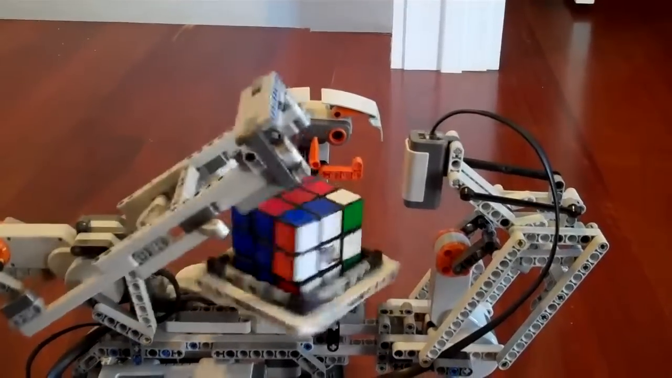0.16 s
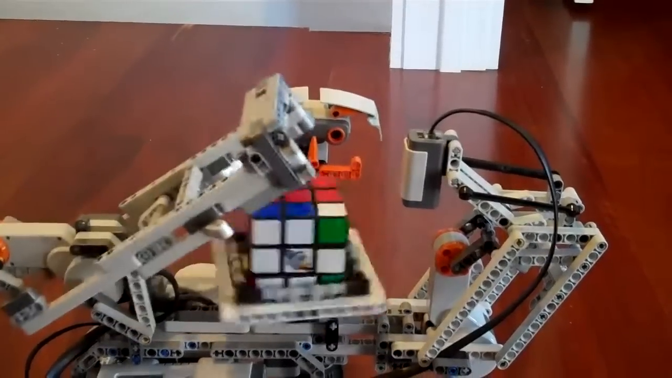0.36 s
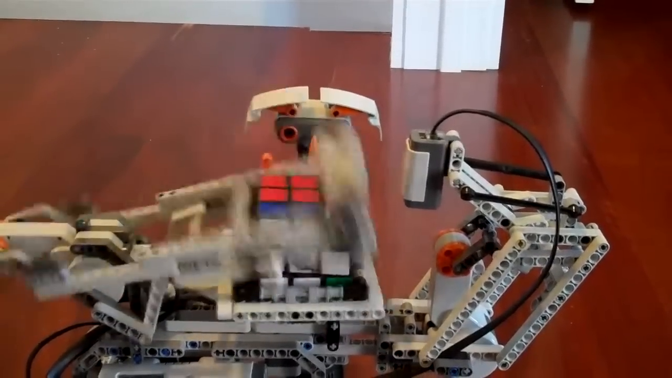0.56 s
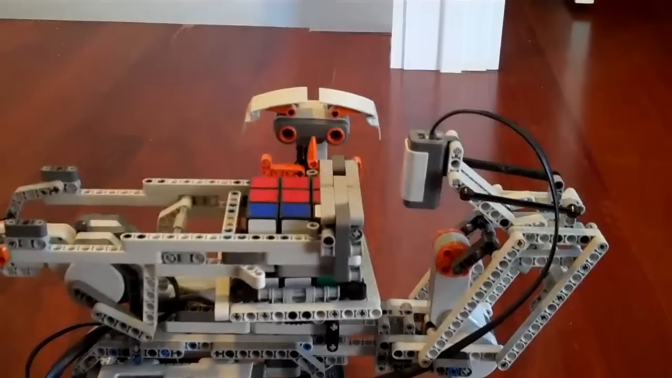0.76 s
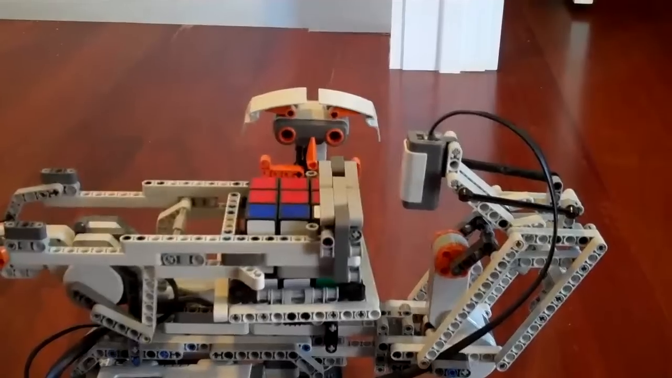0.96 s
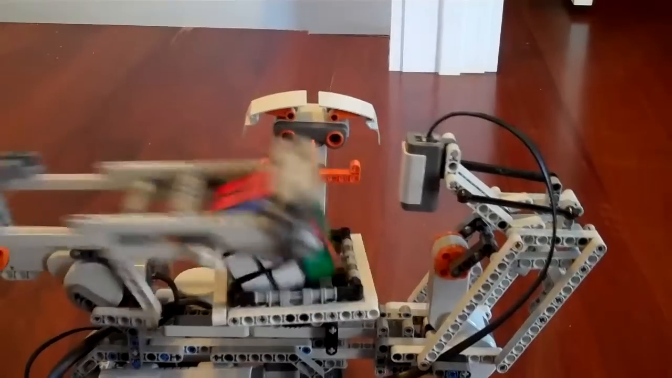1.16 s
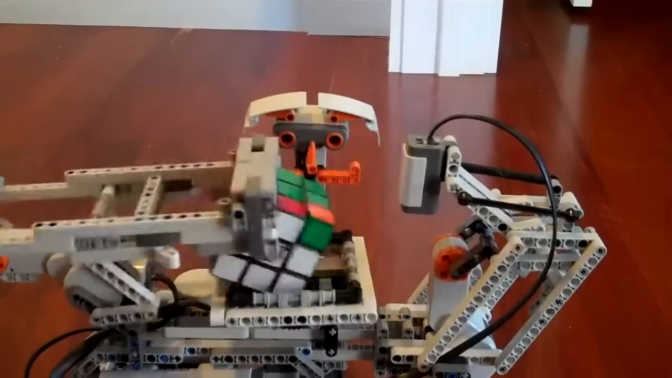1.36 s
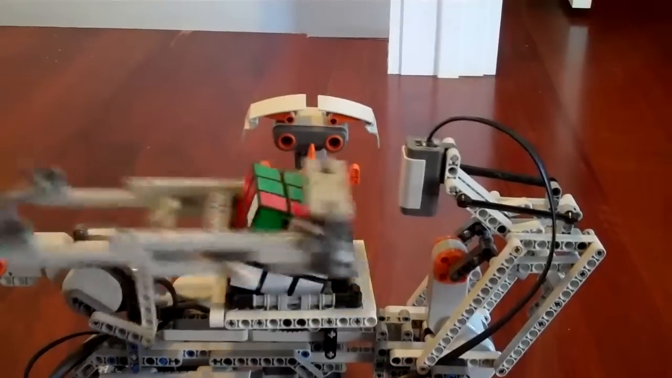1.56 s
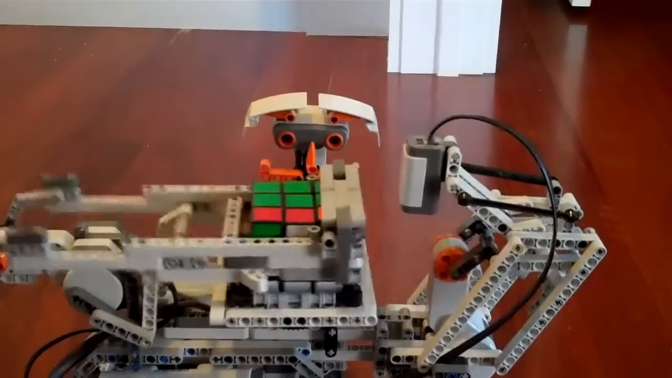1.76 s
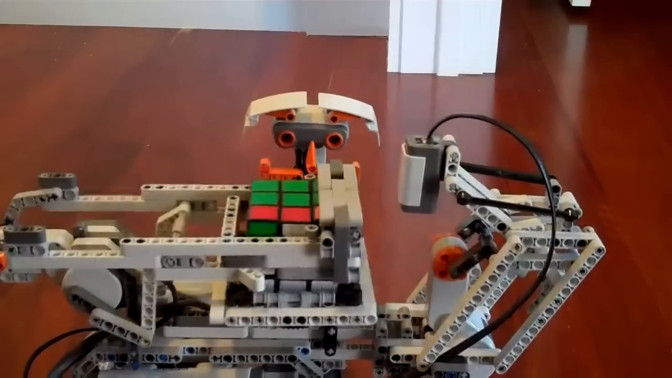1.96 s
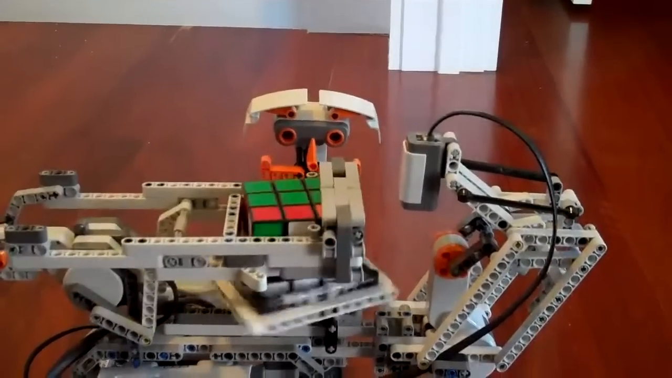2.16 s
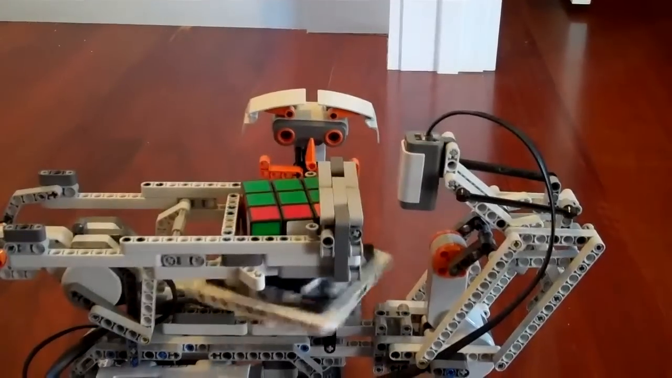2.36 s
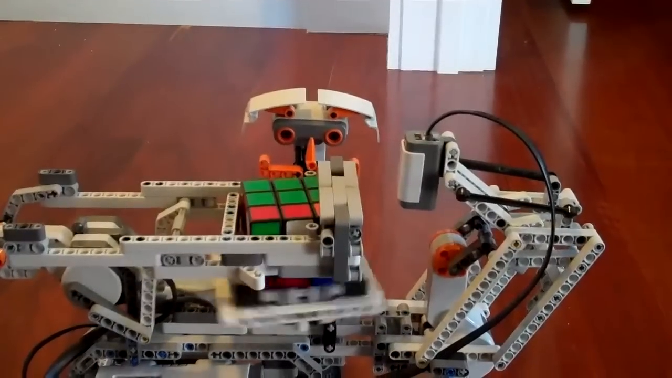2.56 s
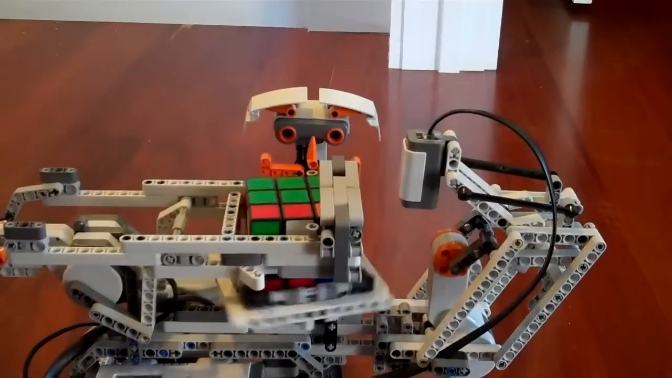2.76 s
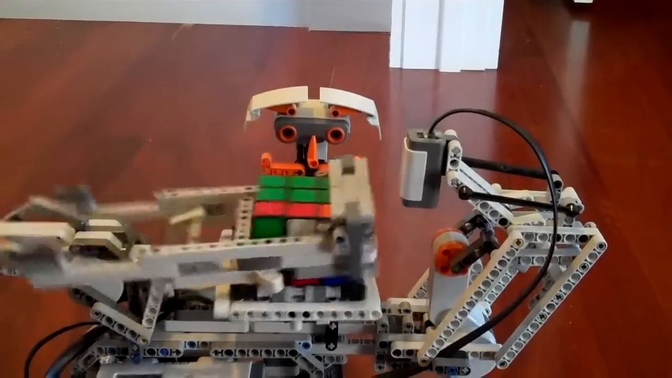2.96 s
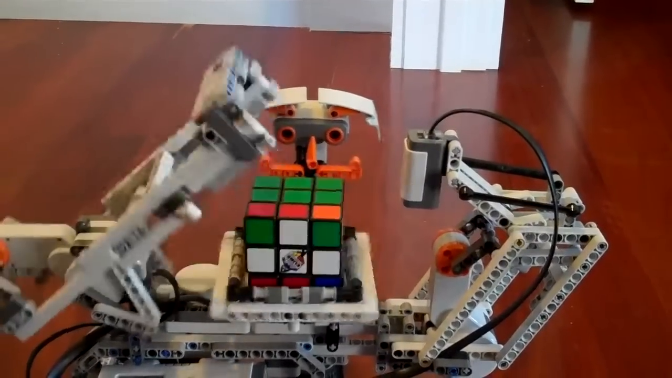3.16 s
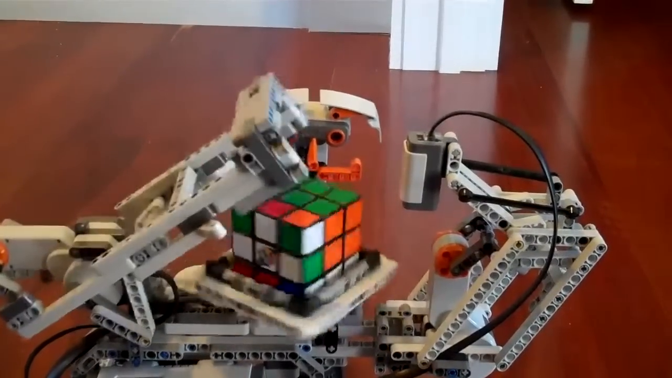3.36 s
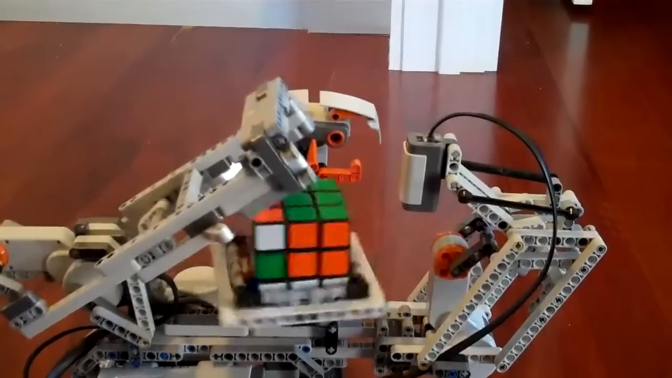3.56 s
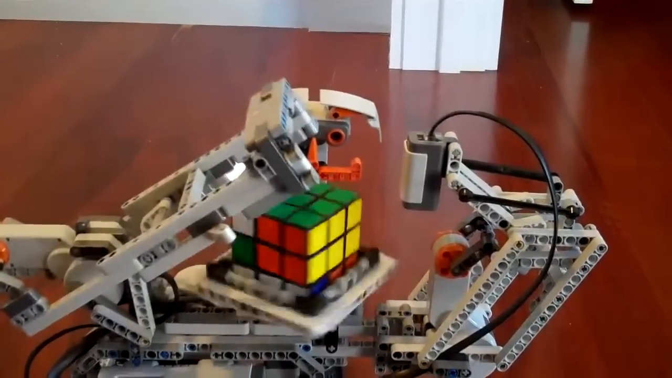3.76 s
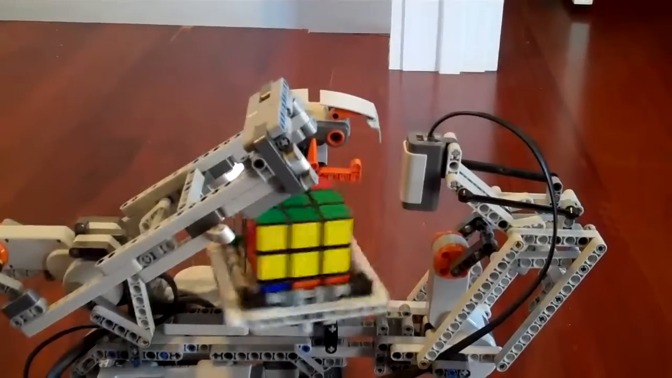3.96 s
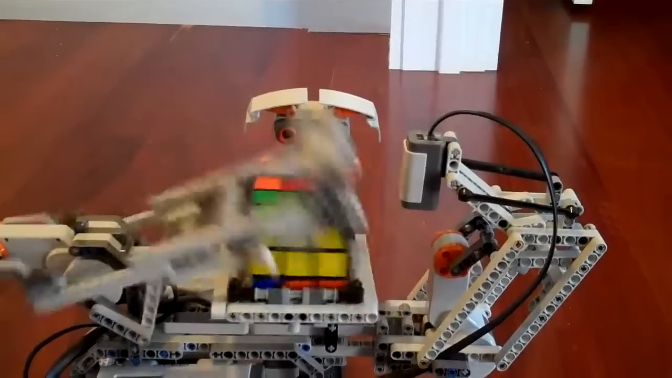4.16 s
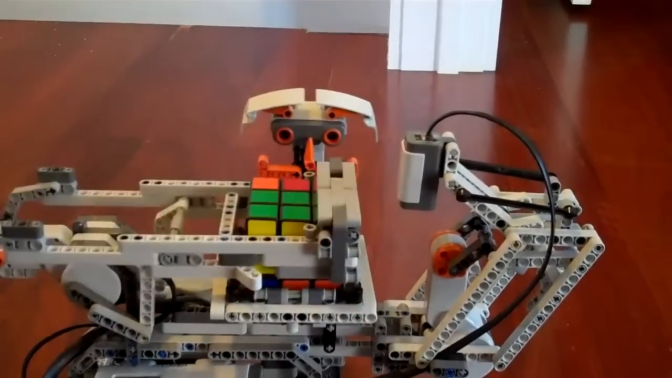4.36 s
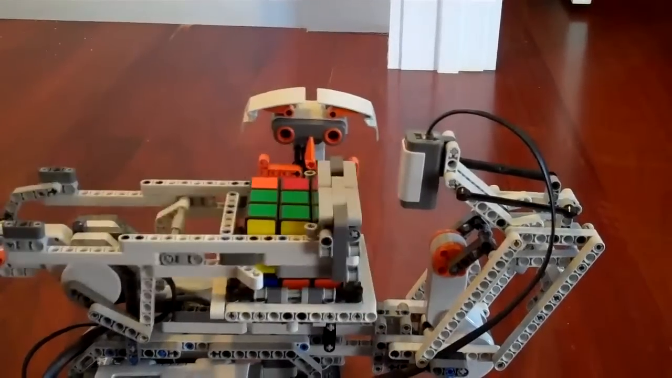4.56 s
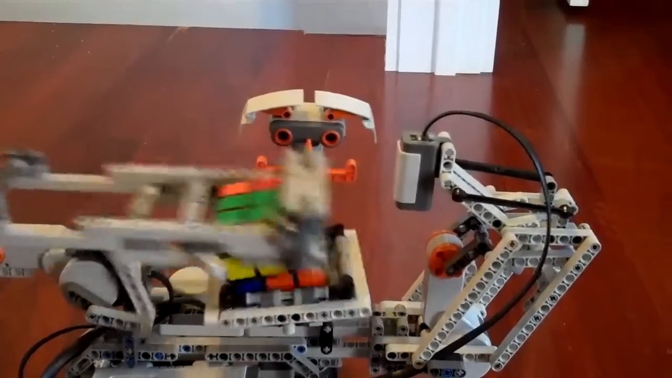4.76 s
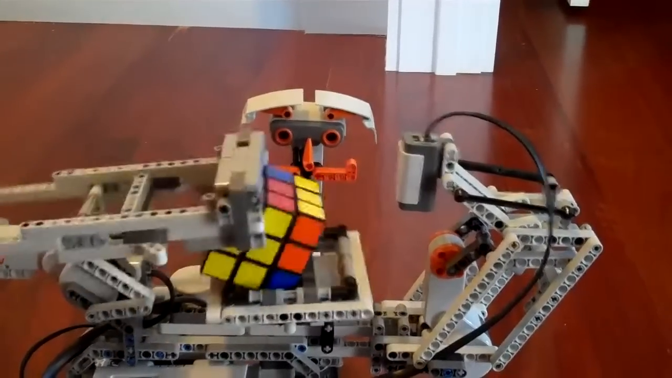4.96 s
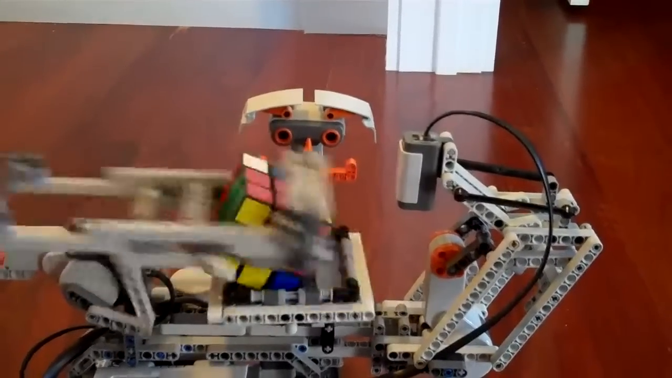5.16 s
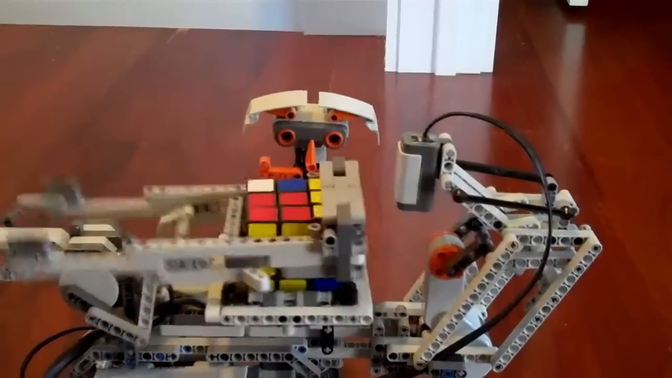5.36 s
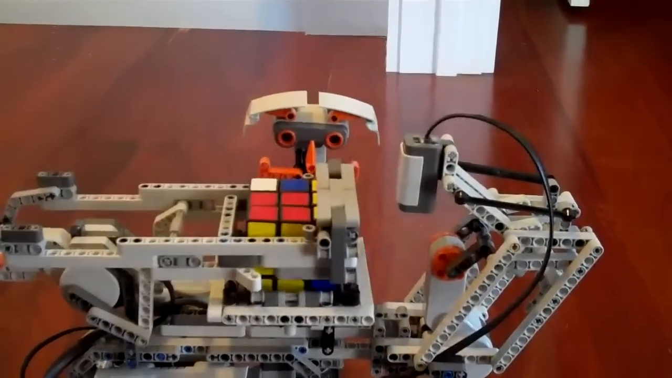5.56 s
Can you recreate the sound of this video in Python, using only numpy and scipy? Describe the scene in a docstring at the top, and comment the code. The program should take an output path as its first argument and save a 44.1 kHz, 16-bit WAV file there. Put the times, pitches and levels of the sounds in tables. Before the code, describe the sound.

A plastic toy robot works a puzzle cube close to a stereo microphone, slightly left. A half-second turntable whir gives way to loud clacks, then brief arm-motor zips and clicks. Two longer grinding whirs follow, split by a short arm burst; another loud clack leads into more zips and ticking knocks. Small, fairly dry room with faint low rumble.

```python
"""A plastic toy robot on a hard floor turns and flips a puzzle cube, close to a two-port microphone.
The turntable runs in the first half second; the flipping arm then works in short bursts amid knocks until 2 s.
Two more turntable stretches follow (2.1 to 3 s, 3.3 to 4.1 s), then arm and knocks again to the end.
Geared motors are noise impacts through a housing filter plus overtones of the tooth rate; knocks are
modes rung by bursts of contacts; filtered noise makes the floor rumble, room murmur and faint hum below."""
import sys
import numpy as np
from scipy import signal
from scipy.fft import rfft, irfft
from scipy.io import wavfile
from scipy.ndimage import uniform_filter1d

SR = 44100
rng = np.random.default_rng(int(sys.argv[2]) if len(sys.argv) > 2 else 0)


def digitize_waveform(pressure):
    """Quantize a signal to 16-bit integers and store it at the path in sys.argv[1].

    Rows of a 2-D input are taken as channels; values are limited to [-1, 1].
    """
    field = np.atleast_2d(pressure).T
    bounded = np.clip(field, -1, 1)
    quanta = np.round(bounded * 32767).astype(np.int16)
    wavfile.write(sys.argv[1], SR, quanta)


N = 247842

# impacts of cube and arm: start_s, peak_db (middle band), low_db and treble_db (against that peak), pitch_hz
KNOCK_EVENTS = [(.6742, -2, -23, -8, 5000), (.6863, -18.5, -11.5, 4, 4490), (0.7328, 1, -19.5, -7, 4700),
                (0.7595, -18, -11.5, -7, 4440), (0.8678, -34.5, -15, -4, 4250),
                (0.9265, -35.5, -23, -16, 5380), (1.055, -32, -20, -19, 5470),
                (1.2113, -15.5, -28, -14, 5700), (1.2397, -21, -16, -11, 5270),
                (1.3998, -33, -21, -12, 2320), (1.4346, -19.5, -27, -4, 4830),
                (1.479, -21.5, -20, -7, 4700), (1.494, -13.5, -24, -7.5, 4050),
                (1.5402, -34, -13, -9, 3710), (1.566, -33, -20, -11, 5000), (1.6422, -19.5, -22, -11, 5660),
                (1.6633, -15, -26, -8, 5440), (1.7071, -11, -28, -7, 5100), (1.7672, -8.5, -23, -9.5, 3630),
                (1.7924, -16.5, -15.5, 0, 4250), (1.896, -19, -39, -12, 5500), (1.9724, -28, -33, -3, 5400),
                (3.05, -22, -24, -18, 4871), (3.0715, -15, -15, -23, 5817),
                (3.2597, -16.5, -32, -2.5, 5800), (4.2978, -8.5, -20, -4, 5270), (4.319, -19, -18, 1, 5440),
                (4.3465, -11.5, -17.5, 4, 3840), (4.351, 0, -24, -7.5, 5370),
                (4.377, -15.5, -17.5, -17, 5470), (4.45, -30.5, -27, -15, 5350),
                (4.4782, -32, -28, -15, 5190), (4.5356, -39, -21, -17, 4310), (4.573, -39, -19, -12, 5800),
                (4.8596, -20, -23, -14, 4380), (5.0247, -21, -19, -2, 5960), (5.0929, -20, -14, -12, 3260),
                (5.168, -40, -25, -3, 3500), (5.2818, -14, -33, -2.5, 5740), (5.312, -18, -24, -15, 5000),
                (5.3151, -15, -11, -15, 3500), (5.386, -27, -10, -3, 3836), (5.3946, -21, -13, -16, 4252),
                (5.409, -29, -6, -9, 4110), (5.4458, -27.5, -16, -11, 3070), (5.4605, -16, -27, -5.5, 5860)]


def turntable():
    """Gear-mesh excitation: the turntable's motor runs rattle its teeth, and load makes them whine."""
    # powered runs: start_s, powered_s, full_level_db, spin_up_ms, coasting_fade_db_per_s
    runs = [(.04, .475, -28.5, 32, 280), (2.075, .665, -23.5, 60, 235), (2.795, .155, -24, 55, 250),
            (3.25, 0.892, -26.5, 38, 287)]
    # whine bursts, each a list of points: time_s, tooth_rate_hz, whine_against_rattle_db
    whine = [
        [(.15, 850, -7), (.5, 850, -7)],
        [(2.19, 580, -9), (2.23, 660, -6), (2.25, 697, -1), (2.38, 712, -1), (2.46, 724, -3), (2.5, 742, -5)],
        [(2.5, 742, -6), (2.6, 768, -5), (2.7, 768, -5), (2.73, 745, -6), (2.76, 715, -9), (2.79, 670, -14)],
        [(3.38, 855, -6), (3.7, 860, -6), (4.14, 853, -6)],
    ]
    # for each burst: teeth per shaft turn
    tooth_counts = [10, 7, 7, 10]
    # for each burst: wander of the tooth timing (periods)
    scatter = [.18, .07, .12, .13]
    # for each burst: position of the second wheel as the whine starts (turns)
    wheel_turn = [.5, .2, -.1, -.2]
    # relative response of the housing to rattling teeth: frequency_hz, density_db_per_hz
    body = [(240, -60), (400, -35), (630, -28), (1430, -19), (1700, -13), (2280, -9), (2560, -5),
            (3350, -9.5), (3750, -4), (4150, -0.5), (5000, -4), (5900, -10.5), (6700, -8), (11400, -22.5),
            (13400, -30.5), (14900, -78)]
    # relative response to loaded teeth: frequency_hz, density_db_per_hz
    mesh = [(350, -42), (720, -23.5), (900, -27), (1200, -8), (1430, -6), (1720, -11), (2150, -8.5),
            (2800, 0.5), (3550, -9.5), (4300, 3), (5000, 1), (5800, -18), (7900, -7), (12000, -19),
            (15000, -41)]
    return motor(run_level(runs), whine, tooth_counts, scatter, body, mesh,
                 shaft_db=1.7, wheel_db=1.8, wheel_turn=wheel_turn, grain_db=1.5)


def flipping_arm():
    """Gear-mesh excitation under transient load: powered runs, knocks and creaks all stir the arm's teeth."""
    # powered runs: start_s, powered_s, full_level_db, spin_up_ms, coasting_fade_db_per_s
    runs = [(-.1, .1, -29.5, 20, 195), (.562, .203, -25.5, 22, 270), (1.158, 0.16, -25.5, 31.3, 192),
            (1.548, 0.053, -30, 11.4, 74), (1.708, .032, -21, 16, 700), (1.7, .1, -29, 13, 430),
            (1.82, 0.075, -29.5, 7.7, 380), (3.022, 0.17, -23, 27, 181), (4.196, 0.12, -22, 26.8, 230),
            (4.34, 0.043, -27, 10.3, 330), (4.785, 0.17, -29, 25, 280), (4.965, .052, -29.5, 18.6, 480),
            (5.165, 0.064, -29.5, 24.5, 147), (5.308, .04, -22.5, 13, 260), (5.372, .03, -29, 8, 600),
            (5.415, 0.098, -32.5, 20, 240)]
    # whines: start_s, stop_s, first_hz, steady_hz, easing_ms, timing_wander_periods
    whine_rows = [(.603, .67, 456, 635, 38, .03), (1.214, 1.335, 479, 662, 46, .025),
                  (1.57, 1.63, 429, 625, 38, .1), (1.722, 1.75, 870, 750, 20, .035),
                  (3.08, 3.22, 674, 765, 60, .045), (4.228, 4.29, 455, 700, 65, .04),
                  (4.84, 4.96, 485, 674, 40, .018), (5.2, 5.25, 440, 750, 65, .1),
                  (5.325, 5.37, 832, 760, 65, .03)]
    # relative response of the housing to rattling teeth: frequency_hz, density_db_per_hz
    body = [(240, -58), (400, -35.5), (1000, -18.5), (1700, -11), (2600, -5), (3400, -7), (4350, -1),
            (4900, -4), (5450, -1), (6200, -6), (7200, -7.5), (9500, -14.5), (12300, -23.5), (13800, -31),
            (14900, -81)]
    # relative response to loaded teeth: frequency_hz, density_db_per_hz
    mesh = [(300, -49), (600, -36.5), (1250, -13.5), (1900, -5.5), (2600, -4.5), (3400, -6), (4300, 2.5),
            (4850, 0), (5400, 6), (6100, -3), (7100, -6.5), (9000, -8), (10500, -21), (12000, -13),
            (15000, -50)]
    whine = [ease(*row[:-1]) for row in whine_rows]
    scatter = [row[-1] for row in whine_rows]
    level = np.hypot(run_level(runs), shake_level())
    teeth_per_turn = 7
    return motor(level, whine, [teeth_per_turn] * len(whine), scatter, body, mesh,
                 shaft_db=0.63, wheel_db=0.15, wheel_turn=[0] * len(whine), grain_db=0.67)


def motor(level, whine, tooth_counts, scatter, body, mesh, shaft_db, wheel_db, wheel_turn, grain_db):
    """Amplitude modulation by rotation: the rattle throbs with shaft and wheel; loaded teeth add a whine."""
    shaft_turns_per_wheel_turn = 5.6
    (tooth_hz, share_db), loaded, index = columns(whine)
    shaft = 2 * np.pi * np.cumsum(tooth_hz / np.array(tooth_counts)[index]) / SR
    shaft_at_start = shaft[[int(burst[0][0] * SR) for burst in whine]]
    wheel = (shaft - shaft_at_start[index]) / shaft_turns_per_wheel_turn
    wheel = wheel + 2 * np.pi * np.array(wheel_turn)[index]
    throb_db = shaft_db * np.cos(shaft) + wheel_db * np.cos(wheel)

    # sparse impacts on about 15 % of the samples, some much stronger than others
    hits = (rng.random(N) < .15) * rng.standard_normal(N)
    hits = hits * undb(grain_db * rng.exponential(size=N))
    flicker_db = 1.25 * walk(120) + 1.14 * walk(24.37)
    rattle = unit(colour(hits * undb(throb_db + flicker_db), body))

    overtones = teeth(tooth_hz, np.array(scatter)[index])
    tone = unit(colour(overtones * undb(0.63 * throb_db), mesh))
    share = loaded * undb(share_db)
    return level * (rattle + share * tone) / np.sqrt(1 + share ** 2)


def teeth(tooth_hz, scatter, count=20):
    """Harmonic series of the tooth rate: timing wander is shared, each overtone swells and fades alone."""
    turns = np.cumsum(tooth_hz) / SR + scatter * (walk(60) + 0.52 * walk(400))
    total = 0
    for k in range(1, count):
        total = total + undb(3.0 * walk(70)) * np.sin(2 * np.pi * (k * turns + rng.random()))
    return total


def ease(start_s, stop_s, first_hz, steady_hz, easing_ms, count=12):
    """Exponential relaxation of the tooth rate: points of time_s, tooth_rate_hz, whine_against_rattle_db."""
    t = np.linspace(start_s, stop_s, count)
    hz = steady_hz + (first_hz - steady_hz) * np.exp((start_s - t) * 1000 / easing_ms)
    return np.transpose([t, hz, np.full(count, 3.5)])


def run_level(runs):
    """First-order spin-up: level follows a power of speed, then coasts out; powers of the runs add."""
    loudness_exponent = 3.38
    t, power = slow_time(), 0
    for start_s, powered_s, full_db, spin_ms, fade_db_per_s in runs:
        since = np.clip(t - start_s, 0, powered_s)
        after = np.maximum(t - start_s - powered_s, 0)
        speed = 1 - np.exp(-since * 1000 / spin_ms)
        level = undb(full_db - fade_db_per_s * after) * speed ** loudness_exponent
        power = power + level ** 2
    return np.interp(np.arange(N) / SR, t, np.sqrt(power))


def shake_level():
    """Exponential decay of shaken gears: each knock leaves a short rattle, loose joints a slower creak."""
    # creaks of the arm's loose joints: start_s, level_db, fade_db_per_s
    creaks = [(.8, -50, 45), (1.445, -44, 55), (1.93, -51, 20), (4.42, -46, 110), (5.06, -46, 69),
              (5.56, -69, 60)]
    shake_db, shake_fade_db_per_s = -26.5, 503.5  # level against the knock's own peak
    onset_s = .001
    shakes = [(s, peak_db + shake_db, shake_fade_db_per_s) for s, peak_db, *_ in KNOCK_EVENTS]
    t, level = slow_time(), 0
    for start_s, level_db, fade_db_per_s in shakes + creaks:
        onset = np.clip((t - start_s) / onset_s, 0, 1)
        level = level + onset * undb(level_db - fade_db_per_s * np.maximum(t - start_s, 0))
    return np.interp(np.arange(N) / SR, t, level)


def knocks():
    """Modal synthesis: a burst of contacts rings damped modes, most of all those near the knock's pitches."""
    # modes of brick frame and cube: frequency_hz, level_db, t60_s
    modes = [(384, -17, 0.06), (750, -34.5, 0.016), (1174, 10, 0.011), (1690, -2.5, 0.012),
             (2030, 10, 0.007), (2606, -1, 0.028), (3130, 0.5, 0.012), (3800, 2, 0.011), (4600, 1, 0.011),
             (5340, 6, 0.0054), (6120, -0.5, 0.0056), (6780, -1.5, 0.0035), (7230, 2.5, 0.0035),
             (8250, -3, 0.0063), (9000, -3, 0.0048), (12000, -23, .003)]
    contact_ms, low_pitch_hz = 2.68, 1250
    strike = 0.58  # first contact against all the contacts together
    out, t = np.zeros(N + 4096), np.arange(2048) / SR
    hz, db, t60 = np.transpose(modes)[:, :, None]
    for start_s, peak_db, low_db, treble_db, pitch_hz in KNOCK_EVENTS:
        level_draw, tuning_draw = rng.standard_normal((2, len(modes), 1))
        # modes from 6 kHz up are favoured equally
        favoured_hz = np.where(hz < 1800, low_pitch_hz, np.where(hz < 6000, pitch_hz, hz))
        octaves_off = np.abs(np.log2(hz / favoured_hz))
        gain = undb(db + 2.4 * level_draw - 9.9 * octaves_off - 60 * t / t60)
        ring = np.sum(gain * np.sin(2 * np.pi * hz * (1 + 0.053 * tuning_draw) * t), axis=0)

        contacts = rng.standard_normal(512) * rng.exponential(size=512)
        contacts = contacts * np.exp(-(t[:512] * 1000 / contact_ms) ** 4)
        contacts[0] = strike * np.linalg.norm(contacts)
        hit, i = np.convolve(ring, contacts), int(start_s * SR)
        for lo_hz, hi_hz, part_db in ((384, 2000, low_db), (1910, 6630, 0), (6440, 21000, treble_db)):
            part = band(hit, lo_hz, hi_hz)
            out[i:i + len(hit)] += part * undb(peak_db + part_db) / np.max(np.abs(part))
    return out[:N]


def ports(x):
    """Multipath propagation: direct sound, drifting treble detours and a decaying room reach both ports."""
    room_t60_s, room_db, detour_ms, detour_db = .15, -10, 3.7, -4.5
    t = np.arange(int(.3 * SR)) / SR

    def via(y, path):
        """Convolution with a path of unit energy at each port."""
        path = path / np.sqrt(np.sum(path ** 2, axis=1, keepdims=True))
        return signal.oaconvolve(y[None], path, axes=1)[:, :N]

    room = rng.standard_normal((2, len(t))) * undb(-60 * t / room_t60_s) * (t > .004)
    # a random angle shifts the balance between two sets of detours
    pose = 3.0 * walk(30)
    detours = band(rng.standard_normal((2, 2, len(t))) * np.exp(-t * 1000 / detour_ms), 6100, 16800)
    moving = via(x * np.cos(pose), detours[0]) + via(x * np.sin(pose), detours[1])
    # direct sound arrives one sample later at the right port
    direct = signal.lfilter(*signal.butter(2, 8500, fs=SR), [x, np.roll(x, shift=1)])
    return direct + undb(detour_db) * moving + undb(room_db) * via(x, room)


def background():
    """Partly coherent noise fields: floor rumble and boom, room murmur and a faint wavering hum."""
    # levels before the offset between the ports: time_s, rumble_db, boom_db, murmur_db
    levels = [(0, -59.5, -66.5, -60.5), (.7, -55.5, -62.5, -64.5), (1, -63.5, -67, -66),
              (2.4, -64, -65, -64), (3.45, -67, -64, -61), (3.69, -67, -55, -60.5),
              (3.9, -65.5, -63, -63.5), (4.41, -68, -63, -62), (4.54, -75, -68, -73),
              (4.8, -77, -69.5, -70.5), (5.62, -69, -65.5, -65.5)]
    # relative spectrum of the murmur: frequency_hz, density_db_per_hz
    murmur_spectrum = [(120, -47), (200, -15.5), (289, -8.5), (350, -11.5), (382, -7.5), (424, -11),
                       (4400, -13), (13000, -39)]
    # hum before the offset between the ports: time_s, level_db
    hum_levels = [(0, -80), (.8, -67), (1, -61), (1.3, -66), (2.1, -64.5), (3, -77), (4.5, -83),
                  (5.62, -77)]
    hum_hz = 769
    (rumble_db, boom_db, murmur_db), _, _ = columns([levels])
    (hum_db,), _, _ = columns([hum_levels])

    def pair(apart):
        """Noise common to both ports plus separate noise at each."""
        return rng.standard_normal(N) + apart * rng.standard_normal((2, N))

    rumble = unit(band(pair(0.34), 19, 80))
    boom = unit(band(pair(0.82), 86, 209))
    murmur = np.array([colour(x, murmur_spectrum) for x in pair(1.0)])
    murmur = murmur / np.std(band(murmur, 230, 583))
    hum = unit(band(pair(0.45), 0.892 * hum_hz, 1.074 * hum_hz))
    both = undb(rumble_db) * rumble + undb(boom_db) * boom + undb(murmur_db) * murmur + undb(hum_db) * hum
    return both * undb([[1.6], [-1.6]])


def undb(db):
    """Logarithmic level: decibels to amplitude gain."""
    return 10 ** (np.asarray(db) / 20)


def unit(x):
    """Normalisation by mean power: scale to rms 1."""
    return x / np.sqrt(np.mean(x ** 2))


def band(x, lo_hz, hi_hz):
    """Band limitation: steep Butterworth band-pass."""
    return signal.sosfilt(signal.butter(3, [lo_hz, hi_hz], "band", fs=SR, output="sos"), x)


def colour(x, points, size=1024):
    """Minimum-phase filter through (frequency_hz, gain_db) points, from the folded cepstrum of the log gain."""
    hz, db = np.transpose(points)
    grid_hz = np.arange(size + 1) * SR / (2 * size) + 1
    log_gain = np.interp(np.log(grid_hz), np.log(hz), db) * np.log(10) / 20
    cepstrum = irfft(log_gain)
    cepstrum[1:size] *= 2
    cepstrum[size + 1:] = 0
    impulse = irfft(np.exp(rfft(cepstrum)))[:size]
    return signal.oaconvolve(x, impulse)[:N]


def walk(rate_hz):
    """Low-pass random process: levels held for one period of the rate and slewed, with spread near 1."""
    k = int(SR / rate_hz)
    held = np.repeat(rng.standard_normal(N // k + 1), k)
    return 1.18 * uniform_filter1d(uniform_filter1d(held, k), k)[:N]


def columns(tables):
    """Linear interpolation of joined bursts over time; also a soft on-off gate and the burst index."""
    t, rows = np.arange(N) / SR, np.concatenate(tables)
    curves = [np.interp(t, rows[:, 0], column) for column in rows.T[1:]]
    on = sum((t >= b[0][0]) & (t < b[-1][0]) for b in tables)
    index = np.clip(np.searchsorted([b[-1][0] for b in tables], t), 0, len(tables) - 1)
    return curves, uniform_filter1d(1. * on, size=400), index


def slow_time():
    """Control-rate sampling: 1 ms time steps for slowly changing levels."""
    step_s = .001
    return np.arange(0, N / SR + step_s, step_s)


def scene():
    """Superposition: three robot parts, each with its own paths, nearer the left port, over the background."""
    # level difference of the robot between the ports: frequency_hz, left_minus_right_db
    port_tilt = np.array([(60, -24), (110, 5), (200, -1), (370, 3), (690, 2.5), (1260, 4), (2330, 5),
                          (4280, 4), (7870, 1), (14500, 9.5)])
    robot = ports(turntable()) + ports(flipping_arm()) + ports(knocks())
    # half of the difference is given to each port
    tilted = [colour(x, port_tilt * [1, side]) for x, side in zip(robot, (.5, -.5))]
    return np.array(tilted) + background()


def record(dry):
    """Saturation and band limitation: the loudest peaks are rounded, the top octave thins out and is cut."""
    rounded = np.tanh(dry / .95) * .95
    soft = signal.sosfilt(signal.butter(6, 13600, fs=SR, output="sos"), rounded)
    return signal.sosfilt(signal.ellip(10, .2, 80, 15084, fs=SR, output="sos"), soft)


dry = scene()
out = record(dry)
digitize_waveform(out)
```